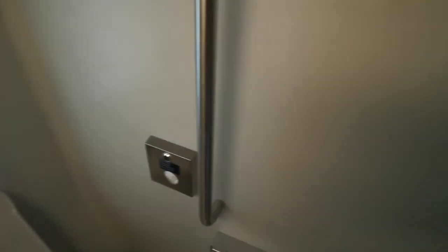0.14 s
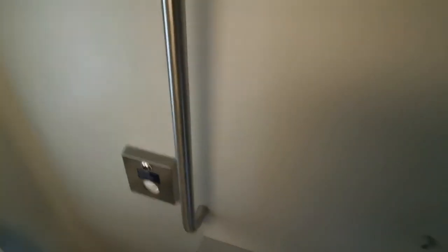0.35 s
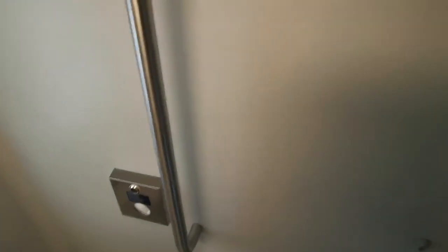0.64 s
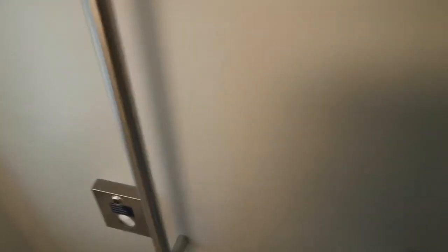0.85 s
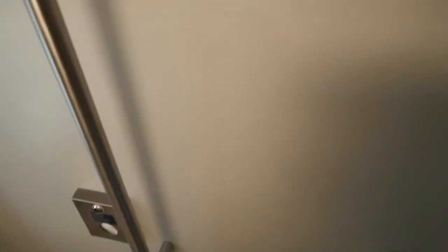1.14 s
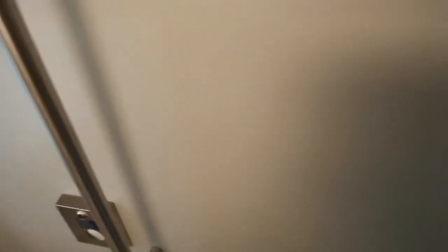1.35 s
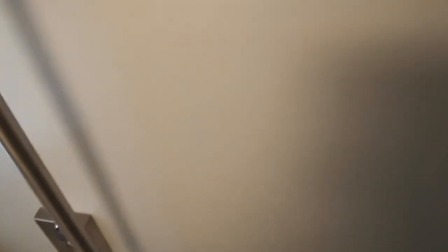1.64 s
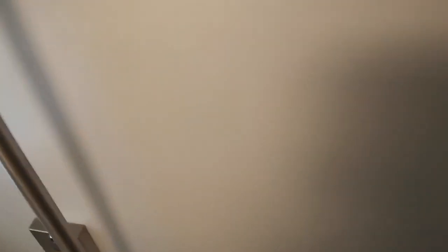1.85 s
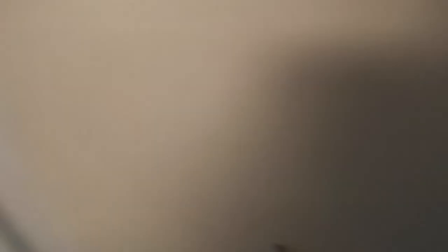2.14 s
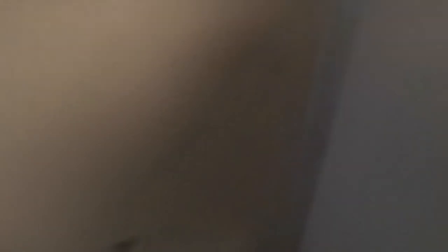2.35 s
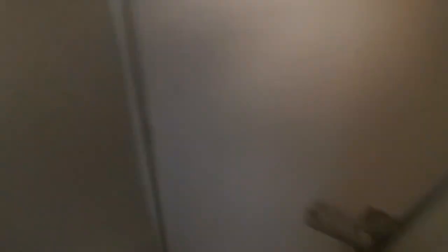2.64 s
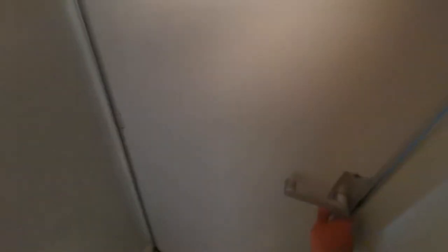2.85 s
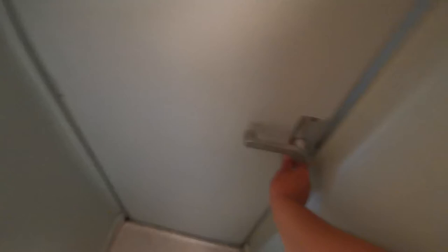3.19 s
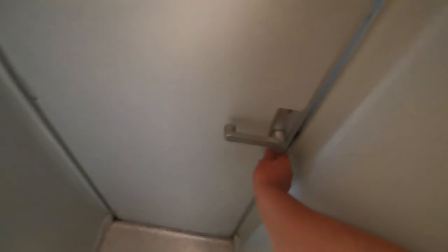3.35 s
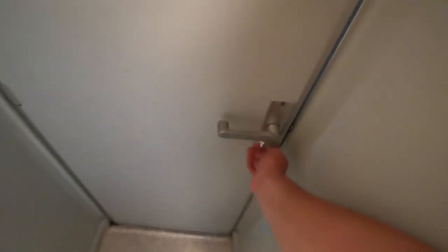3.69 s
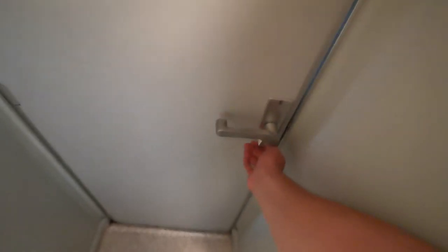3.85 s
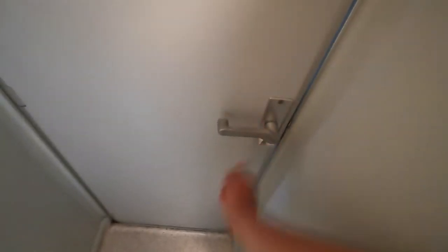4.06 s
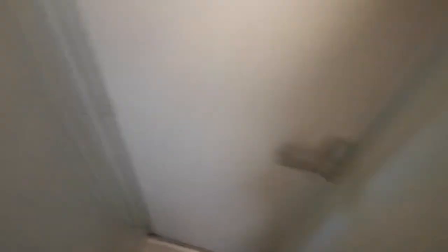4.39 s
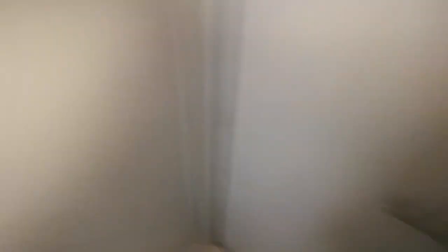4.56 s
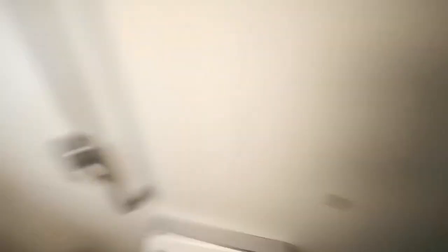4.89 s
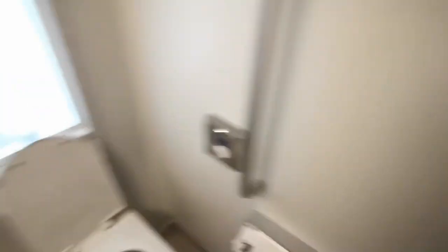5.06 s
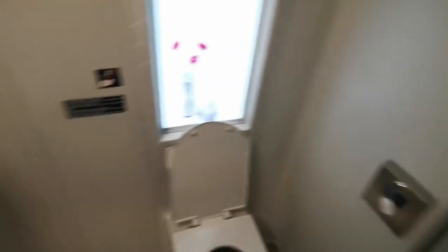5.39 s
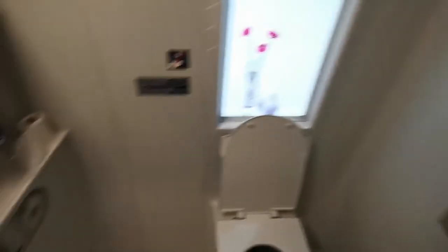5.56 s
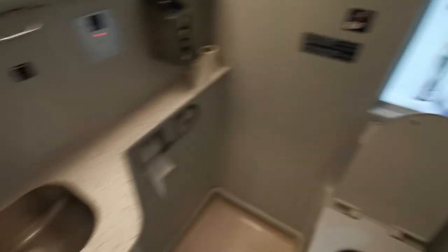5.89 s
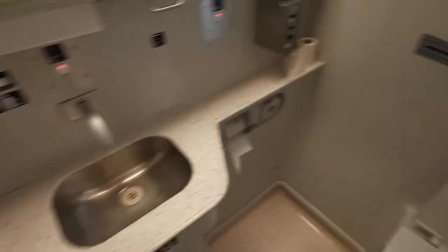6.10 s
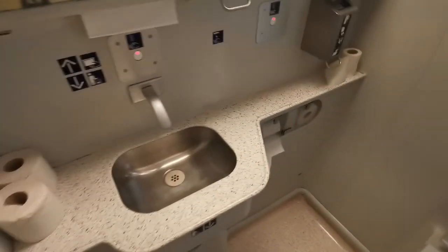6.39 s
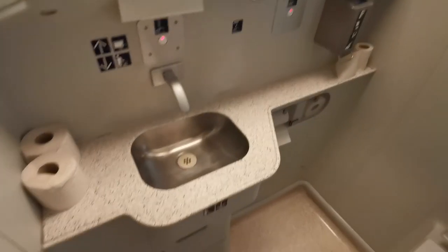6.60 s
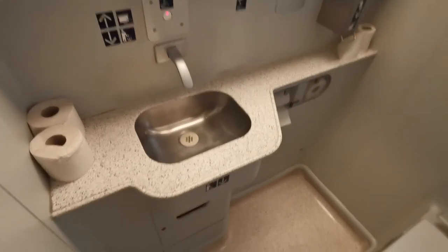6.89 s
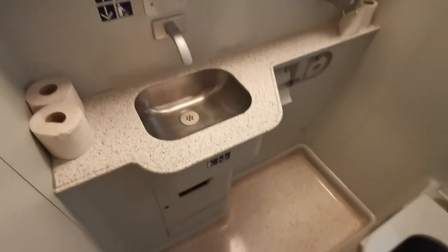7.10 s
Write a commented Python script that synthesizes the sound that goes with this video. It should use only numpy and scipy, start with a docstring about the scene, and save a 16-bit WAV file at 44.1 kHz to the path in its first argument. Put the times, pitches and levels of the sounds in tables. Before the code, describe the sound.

A handheld phone in a cramped, hard-walled train toilet picks up deep uneven rumble, steady rolling noise and thin fan hum throughout. A soft footfall opens, with cloth brushing; at 0.55-0.85 s several rolling hollow floor thuds come, with a small metal click. A latch tick at 1.63 leads to the loudest event, a door slam at 1.76: a hard crack, boxy panel boom and rapid shudder until about 1.9. The handle springs back in clacks at 1.87 and 2.13-2.4, with a dry finger tick close by. A light click comes at 2.97. At 3.6-3.75 the lock turns with a short scrape and sharp clack, then a small ringing knob at 3.9 and ticks near 4.03, among track thuds. Faint high wheel singing flickers around 4.2 and 4.95. Heavier steps fall at 5.7-5.9 with a rattly click. From 6.3 a low carriage boom swells and fades; rumble continues to 7.2.

```python
"""The small toilet cubicle of a moving train, heard from a hand-held phone.
Someone steps in, slams the door, lets the handle spring back, turns the lock and steps round again.
Blows are noise reflections, cracks and decaying modes; cloth is noise, squeaks and hums narrow noise.
Shaped noise rumbles and drones below; fans hum and the wheels sing faintly on one wavering pitch."""
import sys
import numpy as np
from scipy import signal
from scipy.fft import rfft, irfft
from scipy.io import wavfile
from scipy.ndimage import uniform_filter1d

SR = 44100
rng = np.random.default_rng(int(sys.argv[2]) if len(sys.argv) > 2 else 0)


def int16_out(signal):
    """Quantize to a 16-bit WAV file."""
    q = np.round(np.clip(np.atleast_2d(signal).T, -1, 1) * 32767)
    wavfile.write(sys.argv[1], SR, q.astype(np.int16))


N = 319284
BLOW_SIZE = 32768  # samples

# door hits its frame, then shudders: (time [s], level [dB], weight [dB], body [dB], brightness [dB],
# relative snap [dB], build-up [s], panel ring [dB])
DOOR_BLOWS = [(1.7558, -13.5, -7, -1.5, -0.5, -2.5, 0.0027, -4.5),
              (1.763, -18.5, -4.5, 1, -5, -14, 0.00089, -7),
              (1.8061, -21.5, 3.5, 3, -16.5, -16, 0.0012, -0.5),
              (1.822, -24.5, 3, 5, -10, -18, 0.00078, -0.5), (1.8382, -28.5, 4, -3, -8, -9, .001, -1.5),
              (1.852, -28, 6.5, -2, -19, -14, 0.002, -9), (1.906, -37, 4.5, 6.5, -24, -22, .003, -13)]
# door contact spectrum: (frequency [Hz], relative level [dB])
DOOR_SPECTRUM = [(8, -21), (26, 3), (60, 1), (105, 12), (160, -7.5), (240, 1), (290, -2.5), (380, -9.5),
                 (560, -7.5), (720, -5), (1400, -6), (2300, -11), (4000, -14.5), (5200, -17), (7400, -17),
                 (8800, -31.5), (15500, -35)]
# door panel resonances: (frequency [Hz], level [dB], t60 [s])
DOOR_MODES = [(114, -2, 0.44), (368, 6.5, 0.31), (431, -8.5, 0.52), (533, -24, 0.67), (712, 0, 0.28),
              (960, -27, .45), (1062, -26, 0.19), (1090, -24.5, 0.36), (1260, -7, 0.17), (1360, -14, .35),
              (1580, -26, 0.25), (1840, -34, 0.32), (2000, -21.5, .38), (2310, -18.5, 0.2)]
DOOR_CHATTER_DB = 1.5


def door():
    """Each blow on the frame cracks, fills the cubicle and booms in the panel; weight sets the bass."""
    out = np.zeros((2, N))
    for s, db, weight_db, body_db, bright_db, snap_db, build_s, ring_db in DOOR_BLOWS:
        contact = cubicle(build_s, early_db=-8.5, early_s=0.0048) * rattle(DOOR_CHATTER_DB)
        contact = contact + snap(snap_db, edge_hz=5100, fade_s=.0006)
        panel = amp(ring_db) * ring(DOOR_MODES, build_s=0.0078, scatter=0.0036)
        blow = voiced(contact, DOOR_SPECTRUM, body_db, bright_db) + panel
        weight = spectrum([(125, weight_db), (220, 0)], BLOW_SIZE)
        add(out, s, amp(db) * colour(blow, weight))
    return out


# handle, latch and lock contacts, and the room's answer to one tick (2.384 s): (time [s], level [dB],
# body [dB], brightness [dB], relative snap [dB], struck part pitch [Hz], part ring [dB])
CLICKS = [(0.271, -55.5, 0, 1.5, -12.5, 4200, -10), (.578, -50, 10, 10, -6, 1480, -3),
          (0.836, -35.5, -7, -7, -10, 2910, -10), (0.839, -41.5, 1, -23, 13, 3280, -7),
          (1.6339, -35, -12.5, 3, 0, 2650, -14), (1.693, -47.5, -7.5, -13, 5, 3600, -12),
          (1.8715, -27, -22, -7, -3.5, 1585, -8), (1.8842, -36, -22, -7, -7, 1960, -3),
          (1.968, -55, -5.5, 3, -4, 2330, -10), (2.1352, -32, -8.5, -0.5, -4, 2000, -6.5),
          (2.17, -34, -2, -15, -20, 1390, -5), (2.259, -42, 1, -12, -8, 1370, -5),
          (2.2912, -31.5, -5, -2.5, -5, 1330, -8), (2.302, -38.5, 4.5, -11, -11, 712, 3.5),
          (2.384, -45, 5, -1.5, -12, 2250, -19), (2.484, -54.5, -0.5, -9, 3, 4260, -11),
          (2.9655, -39, -3.5, -1, -10.5, 1570, -6), (3.5822, -43, -6.5, -35, -7, 2590, -25),
          (3.663, -36, 8, 6.5, -8, 1276, -5), (3.7246, -25, -10, 3, -14.5, 3530, -4.5),
          (3.7295, -31, -8, -2, -3, 665, -2), (3.7362, -26, -1.5, -2.5, 1, 615, 1),
          (3.7539, -33, 9.5, 4, 3, 680, -6), (3.8962, -41.5, -5.5, -3, -3.5, 1576, 4),
          (4.0029, -47, 4, -9.5, -1, 3660, -13), (4.032, -44.5, 5.5, -8.5, -4.5, 1083, 1.5),
          (4.0345, -52, -2, 3.5, -2, 3600, -3), (5.2996, -44, -14.5, -4, -3, 2330, -26),
          (5.4001, -49.5, 6.5, 0, -9.5, 3430, -10), (5.81, -41, 1, 13.5, -14, 2210, -1.5),
          (5.821, -44, -11, 3.5, -10, 2300, 1)]
# metal contact spectrum, also for the noise swells: (frequency [Hz], relative level [dB])
LATCH_SPECTRUM = [(60, -36), (110, 6.5), (200, -2), (430, -1), (620, 4.5), (950, -4), (1500, -4),
                  (2700, -3), (4000, -6), (5000, -11.5), (7400, -14.5), (8800, -26), (15500, -28.5)]
# lock case and handle resonances: (frequency [Hz], relative level [dB], t60 [s])
CASE_MODES = [(390, 0.5, .22), (540, -6, 0.48), (627, 2, 0.33), (625, -4.5, .3), (1540, -20, .24),
              (2330, -12.5, .25), (2900, -11, .24), (3460, -11.5, 0.25), (4270, -21.5, .22),
              (4560, -21, .18), (5900, -32.5, .14), (11040, -33.5, .12), (13500, -28, .13)]
# struck part as a short bar, close pair and overtone: (multiple of pitch [1], level [dB], t60 [s])
PART_MODES = [(1.003, 3, 0.14), (1.061, 4, .11), (3.018, -13.5, 0.11)]
CLICK_BUILD_S, CLICK_SOFTENING = 0.0012, 0.97  # weaker snap: slower build-up
CHATTER_S, CHATTER_DB = .0025, 2


def latch():
    """Each click cracks, chatters, rings a part and the lock case, and fills the cubicle."""
    out = np.zeros((2, N))
    for s, db, body_db, bright_db, snap_db, hz, ring_db in CLICKS:
        build_s = CLICK_BUILD_S * amp(-CLICK_SOFTENING * snap_db)
        contact = cubicle(build_s, early_db=-3, early_s=.005) * rattle(CHATTER_DB)
        contact = contact + snap(snap_db, edge_hz=6000, fade_s=0.00034)
        contact = voiced(contact, LATCH_SPECTRUM, body_db, bright_db)
        case = amp(-19.0 + body_db / 2) * ring(CASE_MODES, build_s, scatter=0.0022)
        part = amp(ring_db) * ring(scaled(PART_MODES, hz), build_s, scatter=0.0055)
        add(out, s, amp(db) * (contact + case + part))
    return out


# thumb-turn of the lock let go: (time [s], level [dB])
PINGS = [(3.8958, -44.5)]
# thumb-turn resonances: (frequency [Hz], level [dB], t60 [s])
TURN_MODES = [(1555, 3, 0.31), (1670, -2, .15), (2175, -1, .14), (4420, -7, .15), (4710, -6, 0.2),
              (5020, -9, 0.17), (6363, -9, .1), (7470, -10, 0.17)]


def thumb_turn():
    """Let go by the fingers, the little steel knob rings freely."""
    out = np.zeros((2, N))
    for s, db in PINGS:
        add(out, s, amp(db) * ring(TURN_MODES, build_s=0.0005, scatter=0.002))
    return out


# noise swells briefly before clicks and around the slam: (end time [s], length [s], level [dB])
NOISE_SWELLS = [(0.842, 0.038, -44.5), (1.762, 0.0089, -23.5), (2.119, 0.0073, -63), (3.664, 0.023, -43),
                (3.733, 0.057, -36), (5.815, 0.022, -45)]


def noise_swells():
    """Noise in the latch's colours rises briefly in a straight line, then stops at once."""
    out = np.zeros((2, N))
    for s, length_s, db in NOISE_SWELLS:
        size = int(length_s * SR)
        rough = diffuse(BLOW_SIZE) * rattle(CHATTER_DB)
        swell = voiced(rough, LATCH_SPECTRUM, body_db=6, bright_db=-9.5)
        add(out, s - length_s, amp(db) * swell[:, :size] * np.linspace(0, 1, size))
    return out


# heels, soles and shifts of weight: (time [s], relative level [dB], weight [dB], build-up [s],
# board pitch [Hz], board ring [dB])
STEPS = [(.002, -34, 13, 0.00086, 280, -8), (0.111, -48.5, 10, 0.025, 298, -4),
         (0.541, -35, -10, 0.01, 429, -3), (0.571, -30, -34, 0.038, 740, 0.5),
         (.665, -27.5, -25, 0.0036, 614, -0.5), (.688, -25, 2, 0.0056, 427.4, -0.5),
         (.722, -21.5, 6.5, 0.0064, 239.7, -2), (.748, -22.5, 1.5, 0.02, 603, -2),
         (.83, -28.5, -14, 0.008, 658, -4.5), (2.17, -37, -13, 0.016, 685, 1),
         (4.04, -36, 13, 0.014, 393, 0), (5.689, -31.5, -11.5, 0.045, 663, 0),
         (5.806, -22, -3.5, 0.02, 307, 1.5), (5.858, -23, -3, 0.01, 457, 4.5),
         (5.887, -21.5, -3.5, 0.0075, 655, -5), (6.531, -48.5, -10.5, 0.039, 460, -8)]
# floor thud spectrum: (frequency [Hz], relative level [dB])
FLOOR_SPECTRUM = [(25, 0), (60, 2), (90, 0), (140, 8.5), (200, 1), (300, -2), (470, 0.5), (680, 0.5),
                  (900, -11), (1150, -12), (1500, -26.5), (2500, -26.5), (5000, -77.5), (10000, -101)]
# hollow floor resonances: (frequency [Hz], relative level [dB], t60 [s])
FLOOR_MODES = [(85.5, 0.5, 0.97), (297.7, -5, 0.76), (383.5, -3.5, 0.18), (453.2, -2.5, 0.41),
               (570, -7, 0.087), (678, -9.5, 0.58), (884, -7.5, .35), (1084, -12.5, 0.71)]
# board underfoot: (multiple of pitch [1], level [dB], t60 [s])
BOARD_MODES = [(0.999, 1.5, 0.34), (1.09, -1, 0.25), (1.421, -7.5, 0.27), (2.059, -9, 0.2)]


def steps():
    """Soft, rolling contacts ring the board underfoot; more weight makes the hollow floor boom more."""
    out = np.zeros((2, N))
    for s, db, weight_db, build_s, hz, ring_db in STEPS:
        thud = voiced(cubicle(build_s, early_db=-7.0, early_s=0.0014), FLOOR_SPECTRUM, 0, 0)
        thud = thud + amp(-5.5) * ring(FLOOR_MODES, build_s, scatter=0.01475)
        thud = colour(thud, spectrum([(130, weight_db), (450, 0.0014)], BLOW_SIZE))
        board = amp(ring_db) * ring(scaled(BOARD_MODES, hz), build_s, scatter=0.012)
        add(out, s, amp(db - 5.5) * (thud + board))
    return out


# fingers tick on the phone case: (time [s], relative level [dB], left minus right [dB])
TAPS = [(2.3822, -17, 11), (3.353, -31, 8.5), (4.456, -24.5, 5)]
# phone case spectrum: (frequency [Hz], gain [dB])
PHONE_CASE_SPECTRUM = [(200, 11), (1000, 3), (2500, -10), (6300, -5.5), (9000, -17), (15500, -15)]


def taps():
    """Dry ticks that reach the ports through the phone's own case."""
    out = np.zeros((2, N))
    t = np.arange(BLOW_SIZE) / SR
    for s, db, side_db in TAPS:
        tick = rng.standard_normal((2, BLOW_SIZE)) * np.exp(-t / 0.0014)
        tick = colour(tick, spectrum(PHONE_CASE_SPECTRUM, BLOW_SIZE))
        add(out, s, amp(db - 9.0) * pan(side_db) * tick)
    return out


# faint squeaks, swishes, short hums and lingering rings: (start time [s], length [s], frequency [Hz],
# width [Hz], level [dB], left minus right [dB], glide [Hz/s])
FAINT_TONES = [(0.328, 0.14, 669, 110, -55, 5, -2), (1.685, .12, 960, 90, -54.5, -8, 0),
               (1.949, 0.29, 953, 24, -60, -13.5, 0), (2.302, 0.36, 947, 49, -63.5, 5, -6),
               (2.706, 0.16, 6300, 1210, -72, 5, -6.5), (2.844, 0.14, 3600, 400, -65, -11, -2),
               (3.135, 0.15, 6050, 1210, -76, 16.5, -11), (3.438, 0.15, 4330, 160, -66, -7.5, -1),
               (4.037, 0.54, 1110, 40.4, -66, -5, 0), (4.554, 0.62, 6100, 1070, -72, 7.5, 0.5),
               (5.678, 0.12, 840, 360, -49.5, -4, 1), (5.864, 0.48, 680, 111, -51.5, 2.5, -1),
               (5.905, 0.27, 2680, 170, -77.5, -12, -2000), (6.495, 0.28, 927, 343, -55, -6.5, -4.5),
               (6.502, 0.089, 4400, 450, -77, -3, 0), (6.547, 0.077, 1460, 500, -60.5, -4, -2.5),
               (6.822, 0.43, 2420, 380, -78, -7, 1000.5), (7.118, 0.17, 2360, 597, -69.5, -9.5, 4),
               (7.14, 0.073, 4200, 550, -73, -9, 2)]


def faint_tones():
    """Each swells and fades in one narrow band; pitch wavers more than strength, and may slide."""
    out = np.zeros((2, N))
    for s, length_s, hz, width_hz, db, side_db, glide_hz_per_s in FAINT_TONES:
        size = int(length_s * SR)
        from_middle_s = np.arange(size) / SR - length_s / 2
        wave = signal.hilbert(narrow(hz, width_hz, size))
        evened = wave / np.sqrt(np.abs(wave))
        glide = np.exp(1j * np.pi * glide_hz_per_s * from_middle_s ** 2)
        tone = unit(np.real(evened * glide))
        add(out, s, amp(db) * pan(side_db) * tone * np.sin(np.linspace(0, np.pi, size)))
    return out


# sleeves and shoes brush at each movement: (middle time [s], length [s], level [dB], hiss above that [dB])
RUSTLES = [(0, 0.49, -56, -23), (0.587, 0.52, -61.5, -26), (1.115, 0.088, -76, -30),
           (1.675, 0.25, -62.5, -40), (2.167, 0.84, -63.5, -11), (2.942, 0.31, -62, -10),
           (3.273, 0.36, -71.5, -10.5), (3.876, 0.74, -58.5, -23.5), (4.494, 0.33, -59, -14),
           (4.914, 0.44, -63, -11.5), (5.323, 0.45, -58, -24), (6.038, 1, -73, -23),
           (6.582, 0.25, -69.5, -27), (7.24, 0.52, -66.5, -27)]
# cloth spectrum: (frequency [Hz], relative level [dB])
CLOTH_SPECTRUM = [(400, 9.5), (1200, 2), (2200, -1.5), (3500, -8), (5200, -12), (7300, -14), (8800, -33.5),
                  (16000, -40.5)]
RUSTLE_REST_DB, RUSTLE_PAN_DB, HISS_HZ = -72.5, -9.5, 8500  # hiss lies above HISS_HZ


def clothes():
    """Each movement brushes cloth as shaped noise; its smooth sliding adds a fine hiss."""
    brush = amp(RUSTLE_REST_DB) + swells([(s, length_s, db) for s, length_s, db, _ in RUSTLES])
    slide = swells([(s, length_s, db + hiss_db) for s, length_s, db, hiss_db in RUSTLES])
    high_pass = signal.butter(2, HISS_HZ, "high", fs=SR, output="sos")
    hiss = unit(signal.sosfilt(high_pass, rng.standard_normal((2, N))))
    return (brush * noise(CLOTH_SPECTRUM) + slide * hiss) * pan(RUSTLE_PAN_DB)


# slow course of the ride: (time [s], floor rumble [dB], body drone [dB])
RIDE = [(0, -40.5, -89), (.65, -42.5, -42), (1.15, -44.5, -53.5), (1.45, -44.5, -45.5), (1.7, -44, -53.5),
        (2.25, -47, -57.5), (2.7, -41.5, -52), (3.3, -32.5, -45.5), (3.6, -37.5, -47), (4.2, -50, -44.5),
        (4.8, -36.5, -49), (5.03, -47.5, -48.5), (5.25, -42.5, -44.5), (5.48, -41, -50.5),
        (5.75, -31.5, -48.5), (6.05, -29.5, -56.5), (6.3, -36.5, -44), (6.8, -30, -40.5), (7.24, -34, -41)]
# track bumps thud through the floor: (middle time [s], length [s], level [dB])
JOLTS = [(.16, 0.2, -34.5), (2.46, 0.15, -35.5), (2.71, 0.28, -40), (3.79, 0.13, -31.5),
         (3.98, 0.11, -29.5), (4.085, 0.17, -35.5), (4.38, 0.3, -31), (4.58, 0.14, -33),
         (5.975, 0.1, -33.5)]
# floor rumble spectrum: (frequency [Hz], relative level [dB])
RUMBLE_SPECTRUM = [(35, -10.5), (62, -9), (86, 6.5), (112, 3.5), (150, -1), (190, -22), (300, -80.5),
                   (1500, -110)]
# body drone spectrum: (frequency [Hz], relative level [dB])
DRONE_SPECTRUM = [(110, -21), (165, 2), (230, 0), (310, -7), (400, -28), (560, -37), (1000, -37.5),
                  (4000, -87)]
# slow sway spectrum: (frequency [Hz], relative level [dB])
SWAY_SPECTRUM = [(8, -9), (24, 2.5), (45, 11), (62, -10), (110, -54), (1000, -100)]
# steady rolling noise spectrum: (frequency [Hz], relative level [dB])
ROLLING_SPECTRUM = [(150, -3), (350, 5.5), (520, -5), (680, -4), (800, -8), (1050, -7), (1300, -20),
                    (2100, -25.5), (2800, -33), (5000, -41), (7300, -42.5), (8700, -43.5), (16000, -42)]
# ventilation hums: (frequency [Hz], level [dB])
HUMS = [(463, -66.5), (662, -70), (948, -71), (1071, -72.5), (1249, -81.5)]
RUMBLE_STEADY_S, DRONE_STEADY_S, SWAY_STEADY_S = 0.099, 0.11, 0.55  # slower chance swells evened out
SWAY_GAIN_DB, SWAY_SHARE = -38.5, 0.26  # sway follows this share of the rumble's swing in dB
ROLLING_DB, BOOM_FLOOR_DB = -56.5, -6.5


def train():
    """Track shakes floor and body, harder at bumps and shocks; rolling noise and fans go on behind."""
    boom = booms()
    shaking = amp(curve(RIDE, axis=1)) + swells(JOLTS) + amp(BOOM_FLOOR_DB) * boom
    rumble = shaking * steady(noise(RUMBLE_SPECTRUM), RUMBLE_STEADY_S)
    drone = (amp(curve(RIDE, axis=2)) + boom) * steady(noise(DRONE_SPECTRUM), DRONE_STEADY_S)
    sway_gain = amp(SWAY_GAIN_DB) * shaking ** SWAY_SHARE
    sway = sway_gain * steady(noise(SWAY_SPECTRUM), SWAY_STEADY_S)
    rolling = amp(ROLLING_DB) * noise(ROLLING_SPECTRUM) * pan(-1.5)
    hum = sum(amp(db) * narrow(hz, width_hz=16.0, size=N) for hz, db in HUMS)
    return rumble + drone + sway + rolling + hum


# hard shocks boom in the carriage body: (start time [s], level [dB])
BOOMS = [(-.29, -31.5), (6.308, -25)]
BOOM_ATTACK_S, BOOM_HOLD_S, BOOM_FALL_DB_PER_S = 0.14, 0.033, 53.5


def booms():
    """Gain of the body's booming: each shock builds up, holds and dies away."""
    out = 0
    for s, db in BOOMS:
        age_s = np.arange(N) / SR - s
        fall_db = BOOM_FALL_DB_PER_S * np.maximum(age_s - BOOM_ATTACK_S - BOOM_HOLD_S, 0)
        out = out + amp(db - fall_db) * np.clip(age_s / BOOM_ATTACK_S, 0, 1)
    return out


# wheels sing in short notes: (middle time [s], length [s], level [dB])
SINGING = [(1.5, 0.094, -74), (4.17, 0.16, -68), (4.27, 0.12, -73.5), (4.42, 0.13, -76),
           (4.68, 0.098, -78.5), (4.95, 0.11, -69), (5.5, 0.13, -77), (5.68, 0.26, -84), (6.2, 0.2, -81.5),
           (6.54, 0.39, -78), (6.88, 0.3, -69), (7.17, 0.23, -72.5)]
SINGING_HZ, SINGING_WAVER_HZ, SINGING_WIDTH_HZ = 1994, 7, 98
SINGING_ROUGH_DB, SINGING_REST_DB, SINGING_PAN_DB = -7, -89, -15


def wheels():
    """Flange rubbing rail swells one wheel resonance: a wavering sine roughened by narrow noise."""
    waver = unit(uniform_filter1d(rng.standard_normal(N), SR // 50))
    tone = np.sin(2 * np.pi * np.cumsum(SINGING_HZ + SINGING_WAVER_HZ * waver) / SR)
    tone = unit(tone + amp(SINGING_ROUGH_DB) * narrow(SINGING_HZ, SINGING_WIDTH_HZ, N))
    gain = amp(SINGING_REST_DB) + swells(SINGING, arch=0.81)
    return gain * tone * pan(SINGING_PAN_DB)


# cubicle reverberation: (frequency [Hz], t60 [s])
WALLS = [(60, 0.74), (250, 0.49), (900, 0.37), (2500, 0.29), (6000, 0.26), (9000, 0.28), (14000, 0.35)]


def cubicle(build_s, early_db, early_s):
    """Dense reflections after a contact: strong at first, dying at each band's own rate."""
    t = np.arange(BLOW_SIZE) / SR
    field = rfft(diffuse(BLOW_SIZE)) * ripple(depth_db=4.6)
    out = 0
    for own, (_, t60) in zip(np.eye(len(WALLS)), WALLS):
        # overlapping bands, each full at its own frequency
        share = spectrum([(hz, w) for (hz, _), w in zip(WALLS, own)], BLOW_SIZE)
        out = out + irfft(field * share) * amp(-60 * t / t60)
    return out * (1 - np.exp(-t / build_s)) * (1 + amp(early_db) * np.exp(-t / early_s))


def ripple(depth_db):
    """Chance peaks and dips of panel and wall resonances, shallower in the treble."""
    hz = np.geomspace(1250, 19000, num=160) - 1000
    share = np.interp(hz, [280, 350, 1600, 4500], [0, 1, 1, .7])
    db = depth_db * share * np.clip(rng.standard_normal(len(hz)), -2, 2)
    return unit(amp(spectrum(list(zip(hz, db)), BLOW_SIZE)))


def ring(modes, build_s, scatter):
    """Decaying modes, a little different at each blow; short waves reach the ports out of step."""
    t = np.arange(BLOW_SIZE) / SR
    out = 0
    for hz, db, t60 in modes:
        detune, lag = rng.standard_normal(2)
        port_t = t + np.array([[0], [lag * 0.00035]])
        phase = 2 * np.pi * hz * (1 + scatter * detune) * port_t
        out = out + amp(db - 60 * t / t60) * np.sin(phase)
    return out * (1 - np.exp(-t / build_s))


def scaled(modes, hz):
    """Modes given as multiples of a pitch, in Hz."""
    return [(hz * ratio, db, t60) for ratio, db, t60 in modes]


def snap(db, edge_hz, fade_s):
    """Direct crack of metal on metal, ahead of the reflections: a fading burst of random signs."""
    t = np.arange(BLOW_SIZE) / SR
    crack = amp(db + 22) * rng.choice([-1, 1], (2, BLOW_SIZE)) * np.exp(-t / fade_s)
    return signal.sosfilt(signal.butter(1, edge_hz, "high", fs=SR, output="sos"), crack)


def rattle(depth_db):
    """Chatter: a gain that wavers within milliseconds."""
    waver = uniform_filter1d(rng.standard_normal(BLOW_SIZE), int(CHATTER_S * SR))
    return unit(amp(depth_db * np.clip(unit(waver), -2, 2)))


def voiced(x, points, body_db, bright_db):
    """Give a sound its object's spectrum, with added body and treble."""
    db = spectrum(points, BLOW_SIZE)
    db = db - 10 * np.log10(np.mean(amp(db) ** 2))
    tilt = [(750, body_db), (1800, 0.00077), (3000, 0.016), (7500, bright_db)]
    return colour(x, db + spectrum(tilt, BLOW_SIZE))


# likeness of the two ports: (frequency [Hz], correlation [1])
LIKENESS = [(40, .97), (120, .95), (250, .72), (500, .85), (900, 0)]


def diffuse(size):
    """White noise from all sides: the two ports share only the long waves."""
    mid, side = rfft(rng.standard_normal((2, size)))
    alike = np.clip(spectrum(LIKENESS, size), -1, 1)
    mid, side = mid * np.sqrt(1 + alike), side * np.sqrt(1 - alike)
    return unit(irfft(np.array([mid + side, mid - side])))


def noise(points):
    """Diffuse noise of unit level with the given spectrum."""
    return unit(colour(diffuse(N), spectrum(points, N)))


def narrow(hz, width_hz, size):
    """Noise ringing in one narrow resonance: a wavering tone of unit level."""
    resonance = signal.butter(2, [hz - width_hz / 2, hz + width_hz / 2], "band", fs=SR, output="sos")
    ringing = signal.sosfilt(resonance, rng.standard_normal((2, size + BLOW_SIZE)))
    return unit(ringing[:, -size:])  # drop the onset


def steady(x, span_s):
    """Noise with its swells slower than span_s evened out."""
    power = uniform_filter1d(np.mean(x ** 2, axis=0), int(span_s * SR))
    return x / np.sqrt(power + 1e-18)


def swells(rows, arch=1):
    """Gain of (middle time [s], length [s], level [dB]) arches; an arch under 1 flattens the top."""
    t = np.arange(N) / SR
    out = np.zeros(N)
    for s, length_s, db in rows:
        during = np.abs(t - s) < length_s / 2
        out[during] += amp(db) * np.abs(np.cos(np.pi * (t[during] - s) / length_s)) ** arch
    return out


def curve(rows, axis=1):
    """One column of a timed table at every sample."""
    rows = np.array(rows)
    return np.interp(np.arange(N) / SR, rows[:, 0], rows[:, axis])


def spectrum(points, size):
    """(frequency [Hz], value) points joined on a log axis, at every bin of a sound of this size."""
    hz, value = np.transpose(points)
    return np.interp(np.log(np.fft.rfftfreq(size, 1 / SR) + 1), np.log(hz), value)


def colour(x, db):
    """Causal minimum-phase filter with the given gain at each bin."""
    size = x.shape[-1]
    cepstrum = irfft(np.log(amp(db)))
    cepstrum[1:size // 2] *= 2
    cepstrum[size // 2 + 1:] = 0
    return irfft(rfft(x) * np.exp(rfft(cepstrum)))


def amp(db):
    """Amplitude factor of a level in dB."""
    return 10 ** (np.asarray(db) / 20)


def unit(x):
    """Scale to an RMS of 1."""
    return x / np.sqrt(np.mean(x ** 2))


def pan(db):
    """Left and right gains for a level difference, left minus right."""
    return amp(np.array([[db], [-db]]) / 2)


def add(out, s, x):
    """Mix x into out from time s on."""
    start = int(s * SR)
    out[:, start:start + x.shape[1]] += x[:, :N - start]


# shade of the phone body on the left port: (frequency [Hz], gain [dB])
SHADE = [(30, -4), (90, -3.5), (400, -3.5), (900, -1.5), (1400, -4.5), (2200, -14.5), (5000, -10.5),
         (7500, -16), (10000, -2), (16000, -10)]
PORT_LAG_S = .0003


def scene():
    """Door and feet are on the right: the left port hears them later and in the shade of the phone."""
    left, right = door() + latch() + thumb_turn() + noise_swells() + steps()
    left = colour(np.roll(left, int(PORT_LAG_S * SR)), spectrum(SHADE, N))
    return np.array([left, right]) + taps() + faint_tones() + clothes() + train() + wheels()


TOP_HZ = 16100


def record(dry):
    """The phone cuts the top with a steep low-pass."""
    return signal.sosfilt(signal.ellip(10, .2, 80, TOP_HZ, fs=SR, output="sos"), dry)


dry = scene()
out = record(dry)
int16_out(out)
```